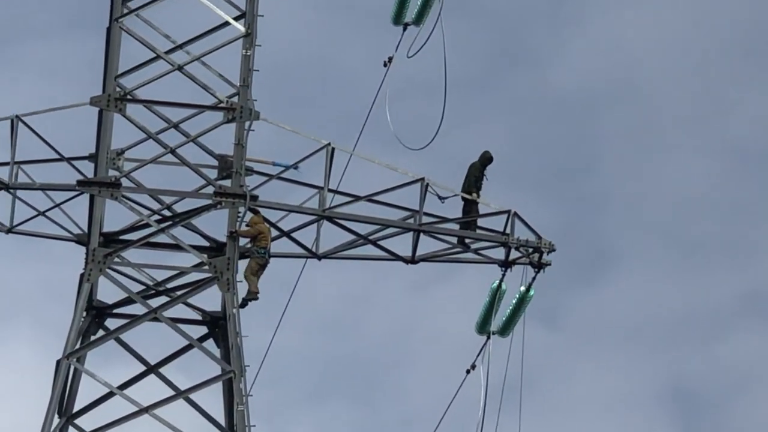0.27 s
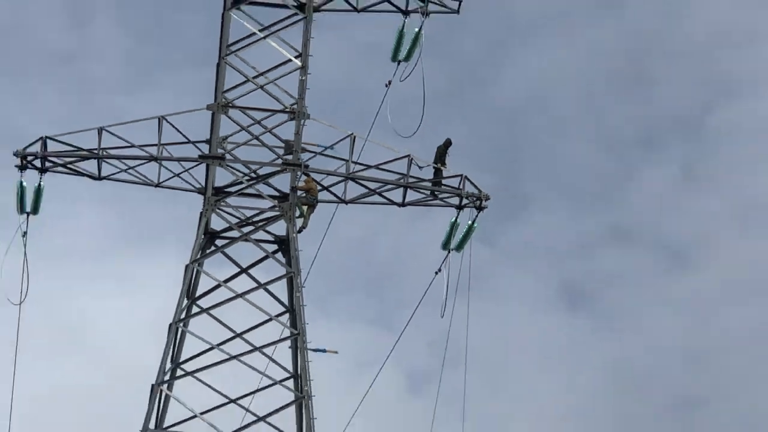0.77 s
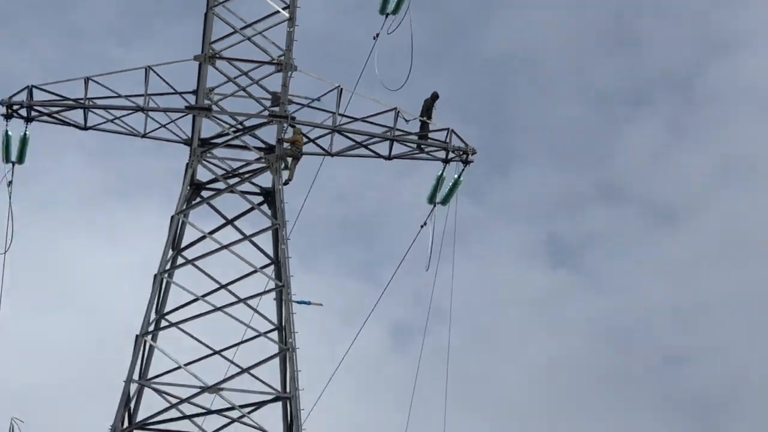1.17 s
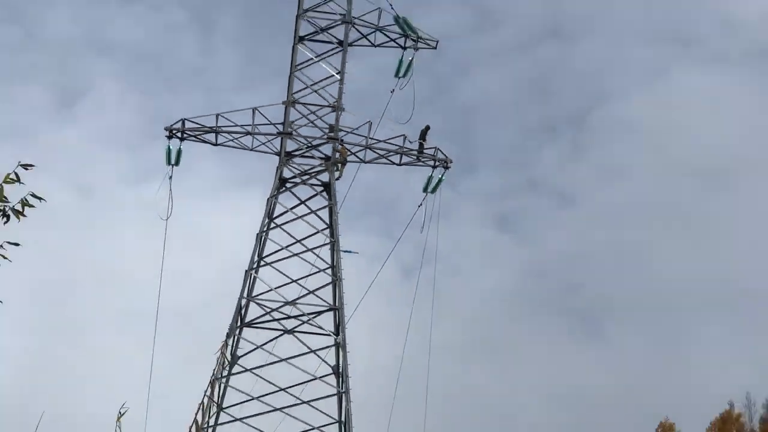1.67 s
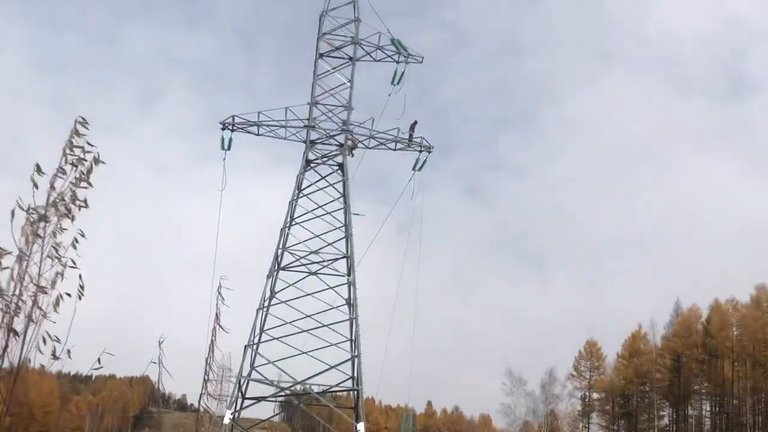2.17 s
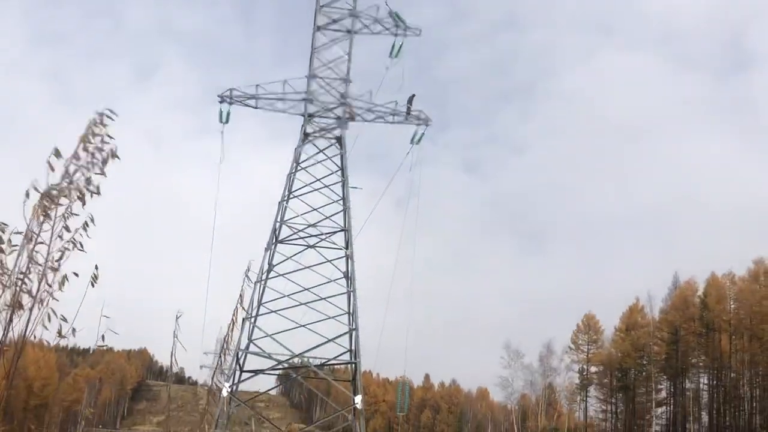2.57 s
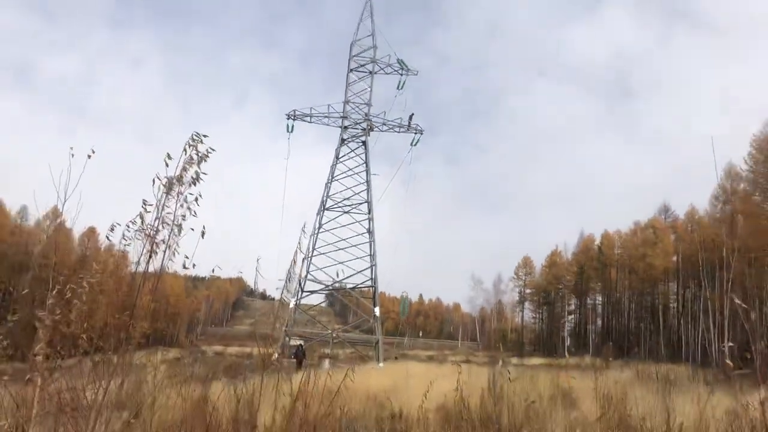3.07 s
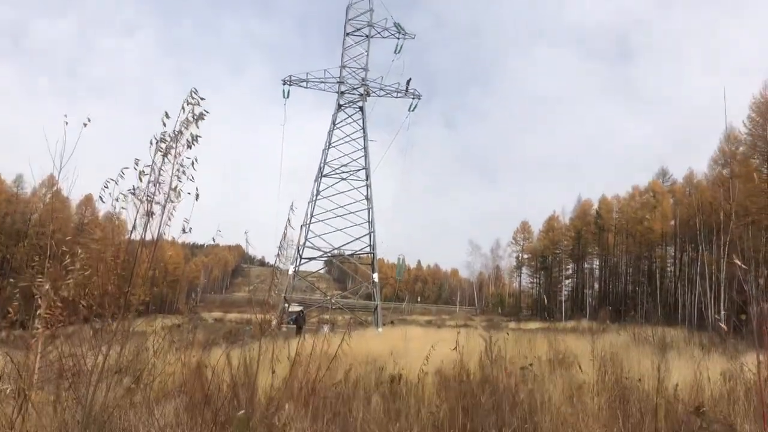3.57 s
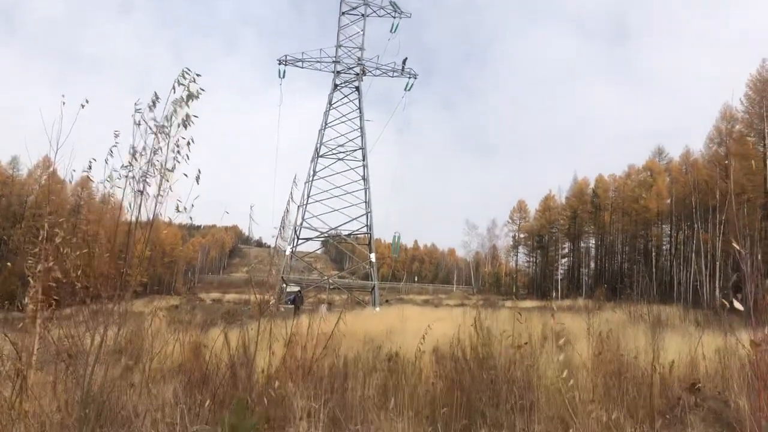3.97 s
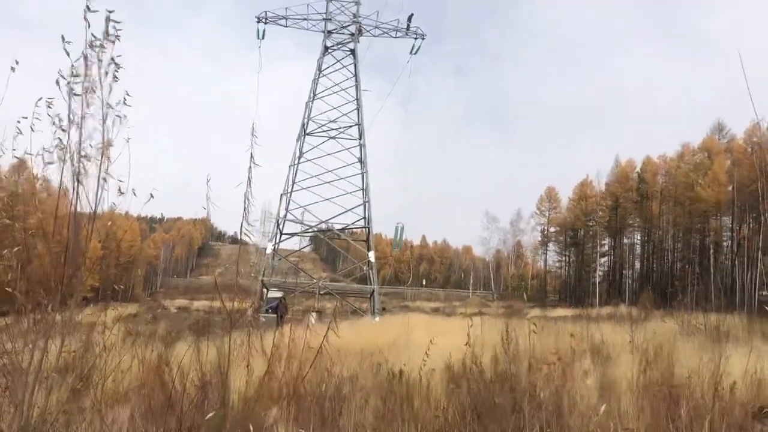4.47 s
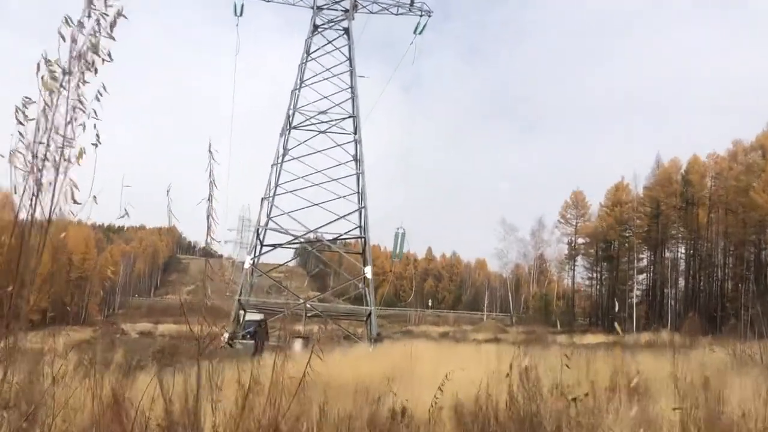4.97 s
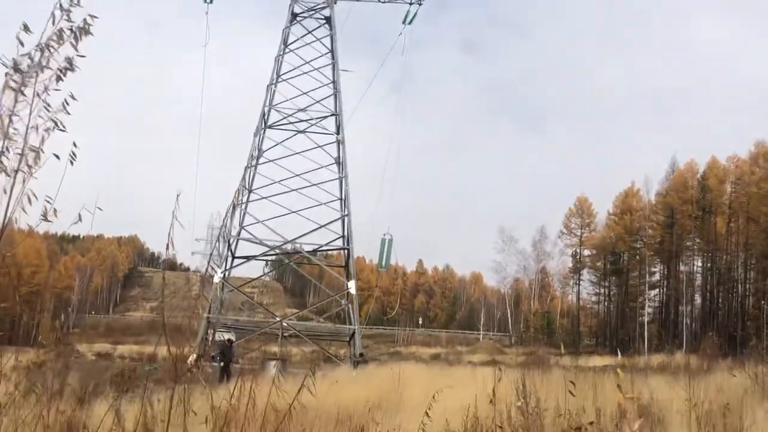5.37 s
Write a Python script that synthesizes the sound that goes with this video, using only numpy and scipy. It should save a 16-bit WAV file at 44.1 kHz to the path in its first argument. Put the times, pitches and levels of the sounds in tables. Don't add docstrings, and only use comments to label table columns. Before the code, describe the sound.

A diesel engine drones at a fixed pitch outdoors while gusty wind thumps and rumbles on the microphone and dry grass hisses faintly.

```python
import sys
import numpy as np
from scipy import signal
from scipy.fft import rfft, irfft
from scipy.io import wavfile
from scipy.ndimage import uniform_filter1d

SR = 44100
rng = np.random.default_rng(int(sys.argv[2]) if len(sys.argv) > 2 else 0)


def volts_from_decibels(level):
    exponent = np.asarray(level, float) / 20
    return 10 ** exponent


def dump_mix(stems):
    frames = np.atleast_2d(stems).T
    limited = np.clip(frames, -1, 1)
    pcm = np.round(limited * 32767).astype(np.int16)
    wavfile.write(sys.argv[1], SR, pcm)


N = 247842

CYCLE_HZ = 11.6795
MESH_TEETH = 56
# multiple of the cycle [ratio], level in [dB rms].
ENGINE_ORDERS = [(3, -56), (6, -41.5), (7, -53), (14, -45.5), (21, -56), (28, -50.5), (29, -77),
                 (30, -63.5), (31, -58.5), (32, -53.5), (35, -48), (42, -54.5), (49, -55), (52, -65),
                 (55, -71), (56, -74), (57, -84.5), (59, -79), (63, -63.5), (70, -58), (77, -59.5),
                 (84, -62.5), (91, -79.5), (98, -79), (105, -68.5), (112, -65.5), (119, -82), (126, -78.5)]
# frequency in [Hz], level in [dB rms].
PULLEY_LINES = [(53, -52.5), (218, -60), (306.5, -55.5), (320, -55.5)]
# multiple of the mesh rate [ratio], band level in [dB rms].
MESH_BANDS = [(2, -63.5), (3, -73.5), (4, -87), (5, -74.5), (6, -78), (7, -80.5), (8, -81)]
# multiple of the cycle [ratio], level in [dB rms].
MESH_LINES = [(9, -57.5), (103, -87), (152, -77), (168, -83.5), (171, -82), (183, -78.5), (206, -83.5),
              (224, -89), (227, -85), (248, -83), (280, -92), (283, -80), (336, -79.5), (391, -95),
              (448, -96), (452, -89.5)]
# frequency in [Hz], density in [dB per Hz].
ROAR_SPECTRUM = [(25, -32), (40, -2), (60, 0), (100, -9), (200, -9), (380, -12), (520, -14.5), (700, -18),
                 (1270, -22), (1550, -29), (2150, -33.5), (2700, -40.5), (4200, -42.5), (9000, -60)]
ROAR_DB = -43
# frequency in [Hz], bandwidth in [Hz], level in [dB rms].
CASING_PANELS = [(306, 160, -57.5), (582, 17, -63.5), (1910, 100, -71), (2144, 25, -73.5)]

# time in [s], strength in [dB].
GUST_STRENGTH = [(0.0, -40.5), (0.3, -37), (0.45, -33.5), (0.6, -37), (0.9, -32), (1.5, -37.5), (1.7, -44),
                 (1.9, -36), (2.1, -44), (2.45, -36.5), (2.7, -38.5), (2.95, -32), (3.5, -35.5),
                 (3.7, -33.5), (4.0, -36.5), (4.2, -32.5), (5.0, -34.5), (5.62, -40.5)]
# frequency in [Hz], density in [dB per Hz].
BUFFET_SPECTRUM = [(20, -23), (35, -20), (60, 2.5), (123, -0.5), (250, -11.5), (400, -20.5), (700, -24),
                   (1500, -67.5)]
# start in [s], peak in [dB], first pitch in [Hz], length in [s].
BIG_EDDIES = [(.379, -12.5, 417, 0.021), (.832, -16, 260, 0.021), (.899, -14.5, 624, 0.021),
              (.970, -15.5, 200, 0.023), (.988, -22.5, 200, 0.02), (1.248, -19.5, 146, 0.026),
              (1.323, -14, 810, 0.011), (2.986, -18.5, 396, 0.012), (2.998, -16, 640, 0.025),
              (3.073, -22.5, 404, 0.0069), (3.086, -15, 800, 0.014), (3.107, -15.5, 260, 0.025),
              (3.199, -18, 342, 0.02), (3.214, -16.5, 355, 0.018), (3.618, -23, 250, 0.013),
              (4.358, -16.5, 706, 0.019), (4.413, -16, 300, 0.021), (4.434, -9, 1000, .021),
              (4.459, -9, 1800, 0.01), (4.554, -22, 584, 0.039), (4.577, -19.5, 390, 0.026),
              (4.781, -17, 605, 0.016), (4.823, -15.5, 394, 0.029), (4.838, -11.5, 610, .013),
              (4.846, -21, 920, 0.011), (4.886, -19, 250, 0.01), (4.9, -17, 400, 0.01),
              (4.958, -21, 790, 0.026), (4.968, -12.5, 660, 0.019), (4.989, -25, 178, .017)]
# start in [s], length in [s], swirl peak in [dB], first pitch in [Hz].
PUFFS = [(0.402, 0.086, -30, 201), (.65, .1, -36, 343), (0.817, 0.074, -25.5, 314), (.955, 0.049, -22, 283),
         (1.1, 0.063, -26.5, 248), (1.172, 0.088, -26.5, 403), (1.289, 0.082, -22, 160),
         (1.47, 0.073, -32, 250), (2.81, 0.22, -31.5, 356), (2.978, 0.071, -23, 352),
         (3.059, 0.076, -22, 686), (3.185, 0.064, -21, 450), (3.321, 0.047, -33, 305),
         (3.459, 0.045, -27.5, 330), (3.61, 0.098, -27, 480), (4.18, 0.14, -32.5, 248),
         (4.35, 0.052, -23, 595), (4.397, 0.061, -20, 680), (4.44, .05, -20, 500),
         (4.485, .125, -24.5, 438), (4.76, 0.055, -26, 402), (4.818, 0.076, -23, 594),
         (4.872, 0.074, -22.5, 350), (4.954, 0.055, -25.5, 680), (5.019, .06, -35, 400),
         (5.273, 0.034, -24.5, 248)]
# start in [s], peak in [dB], first pitch in [Hz].
FRONT_SWIRLS = [(.384, -30, 814), (.82, -29, 706), (0.976, -25, 670), (1.191, -25, 500), (3.087, -35, 1480),
                (3.092, -26.5, 1206), (3.11, -33, 1110), (3.197, -26, 805), (3.629, -29.5, 760),
                (3.681, -34, 800), (4.358, -38.5, 2370), (4.358, -28, 1130), (4.4, -35, 895),
                (4.406, -19.5, 600), (4.419, -20, 600), (4.436, -26, 1400), (4.458, -30, 2596),
                (4.461, -15.5, 800), (4.846, -21.5, 1190), (4.959, -23.5, 1020), (4.966, -34, 2230),
                (4.968, -18.5, 1205)]
PUFF_LIFT_DB = 1
SHED_S, SHED_SCATTER_DB, SHED_OCTAVES = 0.012, -0.5, 0.61
SWIRL_S, SWIRL_SPREAD = 0.0166, 0.33
TRAIL_TURNS = 1.117
FRONT_S, FRONT_FALL = 0.0099, 3.27

# time in [s], hiss level in [dB].
LEAF_LEVEL = [
    (0, -77),
    (.42, -76),
    (.45, -67),
    (.62, -75.5),
    (1.49, -72),
    (1.97, -75.5),
    (2.47, -71.5),
    (5.62, -71.5),
]
# frequency in [Hz], density in [dB per Hz].
RUSTLE_SPECTRUM = [(2650, -18.5), (4500, 7.5), (4910, -6), (5340, 1.5), (9330, -3), (13500, -14.5),
                   (15500, -22)]
# start in [s], peak in [dB], frequency in [Hz], 60 dB decay in [s].
STALK_TICKS = [(0.426, -49, 6200, 0.057), (1.026, -66, 8000, .02), (2.085, -66, 11000, .02),
               (2.49, -63, 11000, .02), (2.905, -57, 9070, .02), (3.436, -52, 12900, .018),
               (3.671, -61, 10500, .02), (3.785, -62, 9500, .02), (4.211, -62, 9500, .04),
               (4.432, -63.5, 10800, .35), (4.913, -60, 11000, .024), (5.393, -54, 11300, .012)]
THIN_HZ, THICK_WIDTH_HZ, THIN_WIDTH_HZ = 11200, 5800, 2800


def evened(x):
    return x / np.sqrt(np.mean(x ** 2) + 1e-20)


def curve(rows):
    return np.interp(np.arange(N) / SR, *np.transpose(rows))


def add(mix, s, sound):
    part = mix[round(s * SR):][:len(sound)]
    part += sound[:len(part)]


def wander(top_hz):
    count, rate = 2048, 200
    lowpass = np.exp(-(np.fft.rfftfreq(count, 1 / rate) / top_hz) ** 2)
    drift = irfft(rfft(rng.standard_normal(count)) * lowpass, count)
    return np.interp(np.arange(N) / SR * rate, np.arange(count), evened(drift))


def ring(x, hz, width_hz):
    return signal.lfilter(*signal.iirpeak(min(hz, 15000), hz / width_hz, SR), x)


def noise(spectrum, patchy_db, size):
    hop, hz = size // 4, np.fft.rfftfreq(size, 1 / SR)
    real, imag, patches = rng.standard_normal((N // hop + 5, len(hz), 3)).T
    patches = uniform_filter1d(patches, size=12, axis=0)
    patches = evened(uniform_filter1d(patches, size=10, axis=1))
    f, db = np.transpose(spectrum)
    colour_db = np.interp(np.log(hz + 1), np.log(f + 1), db, right=-120)
    z = (real + 1j * imag) * volts_from_decibels(colour_db[:, None] + patchy_db * patches)
    return evened(signal.istft(z, nperseg=size, noverlap=size - hop)[1][:N])


def tone(turns, db, waver_db):
    level = np.sqrt(2) * volts_from_decibels(db + waver_db * wander(7.9))
    return level * np.cos(2 * np.pi * (turns + rng.random()))


def engine():
    cycles = np.cumsum(CYCLE_HZ * (1 + 0.00021 * wander(2.14))) / SR
    lines = sum(tone(k * cycles, db - 0.15, waver_db=0.7) for k, db in ENGINE_ORDERS)
    lines += sum(tone(hz / CYCLE_HZ * cycles, db, waver_db=3.0) for hz, db in PULLEY_LINES)
    throb = 1 + 0.07 * np.cos(2 * np.pi * cycles) + 0.037 * np.cos(2 * np.pi * 7 * cycles)
    return lines + throb * roar(cycles) + gears(cycles)


def roar(cycles):
    random_part = volts_from_decibels(ROAR_DB) * noise(ROAR_SPECTRUM, patchy_db=1.1, size=2048)
    alike = np.zeros(N)
    for k in range(2):
        turn = cycles + k / 2
        position = (turn % 1 + 2 * k + 1) * SR / CYCLE_HZ
        alike += np.sin(np.pi * turn) ** 2 * np.interp(position, np.arange(N), random_part)
    out = random_part + alike * volts_from_decibels(-6.5 + 0.74 * wander(2.2))
    for hz, width_hz, db in CASING_PANELS:
        out += volts_from_decibels(db) * evened(ring(rng.standard_normal(N), hz, width_hz))
    return out


def gears(cycles):
    out = sum(tone(k * cycles, db, waver_db=2.0) for k, db in MESH_LINES)
    for k, fuzzy_db in MESH_BANDS:
        band = ring(rng.standard_normal(N), MESH_TEETH * k * CYCLE_HZ, width_hz=110)
        out += volts_from_decibels(fuzzy_db + 1.9 * wander(53.0)) * evened(band)
    return out


def arch(u):
    return np.abs(np.sin(np.pi * np.clip(u, 0, 1)))


def shed():
    rows = []
    chances = rng.standard_normal((len(PUFFS), 16, 4))
    for (s, length, db, hz), chance in zip(PUFFS, chances):
        late, loud, small, long = np.tanh(chance / 2).T * 2
        at = (np.arange(len(late)) + late / 4) * SHED_S
        lasts = SWIRL_S * np.exp(SWIRL_SPREAD * long)
        inside = arch((at + lasts / 3) / length)
        level_db = db + SHED_SCATTER_DB * loud + 10 * np.log10(inside + 1e-9)
        first_hz = hz * 2 ** (SHED_OCTAVES * small)
        rows += list(np.transpose([s + at, level_db, first_hz, lasts]))
    return rows


def eddies():
    out = np.zeros(N)
    swirls = [(s, db, hz, TRAIL_TURNS / length, length) for s, db, hz, length in [*BIG_EDDIES, *shed()]]
    swirls += [(s, db, hz, hz / FRONT_FALL, FRONT_S) for s, db, hz in FRONT_SWIRLS]
    for s, db, first_hz, last_hz, length in swirls:
        u = np.arange(0, length, 1 / SR) / length
        hz = last_hz * (first_hz / last_hz) ** ((1 - u) ** 2)
        swell = np.sin(np.pi * u ** 0.56) ** 2.32
        turns = np.cumsum(hz) / SR + rng.random()
        add(out, s, volts_from_decibels(db) * swell * np.cos(2 * np.pi * turns))
    return signal.sosfilt(signal.butter(4, 2500, fs=SR, output="sos"), out)


def buffeting():
    t = np.arange(N) / SR
    puffs = sum(arch((t - s) / length) for s, length, *_ in PUFFS)
    strength_db = curve(GUST_STRENGTH) + PUFF_LIFT_DB * puffs
    growth_db = 0.79 * (strength_db + 30.5)
    lumps_db = 1.15 * wander(25.0)
    turbulence = noise(BUFFET_SPECTRUM, patchy_db=2.0, size=2048)
    return volts_from_decibels(strength_db - 1 + growth_db + lumps_db) * turbulence


def leaves():
    hiss = noise(RUSTLE_SPECTRUM, patchy_db=0.6, size=512)
    out = volts_from_decibels(curve(LEAF_LEVEL) + 0.6 * wander(30.0)) * hiss
    t = np.arange(8000) / SR
    for s, db, hz, t60 in STALK_TICKS:
        width_hz = THIN_WIDTH_HZ if hz > THIN_HZ else THICK_WIDTH_HZ
        grain = rng.standard_normal(len(t))
        band = evened(ring(ring(grain, hz, width_hz), hz, width_hz))
        attack = np.minimum(t / (0.036 * t60), 1)
        add(out, s, volts_from_decibels(db - 3.5 - 60 * t / t60) * band * attack)
    return out


def scene():
    return (engine() + eddies() + buffeting() + leaves())[None]


def band_limit(x):
    return signal.sosfilt(signal.butter(12, 15640, fs=SR, output="sos"), x)


def record(dry):
    bass_cut = signal.butter(5, 40, "high", fs=SR, output="sos")
    top_cut = signal.firwin(801, 15700, fs=SR)
    mix = signal.sosfilt(bass_cut, dry)
    mix = signal.oaconvolve(mix, top_cut[None], "same")
    return band_limit(mix)


dry = scene()
out = record(dry)
dump_mix(out)
```